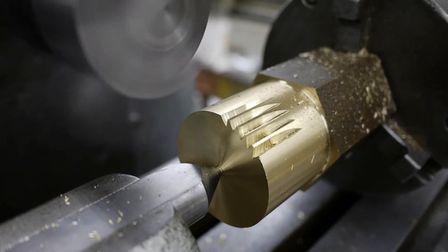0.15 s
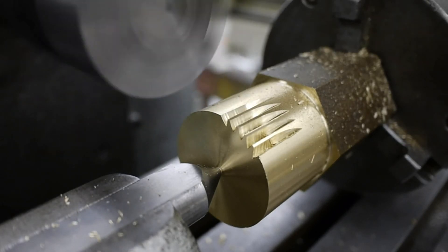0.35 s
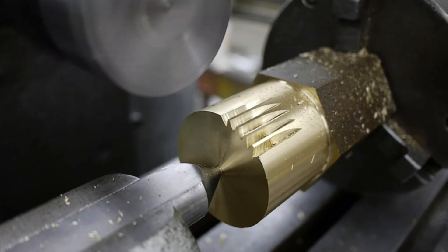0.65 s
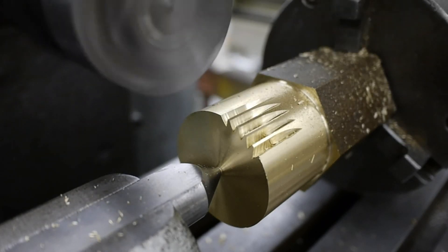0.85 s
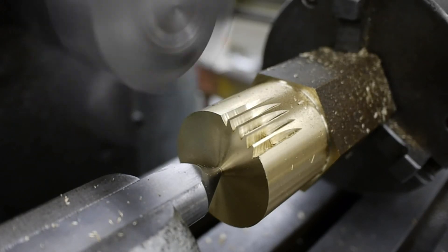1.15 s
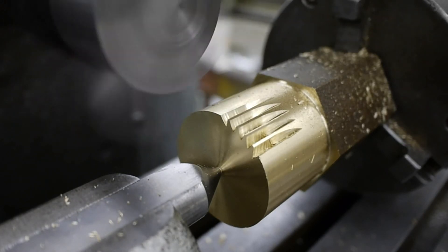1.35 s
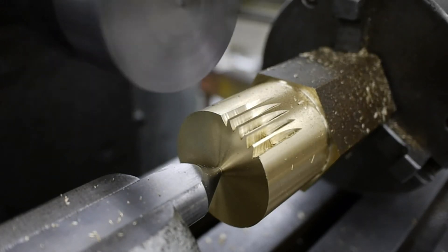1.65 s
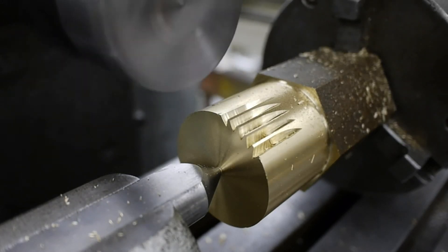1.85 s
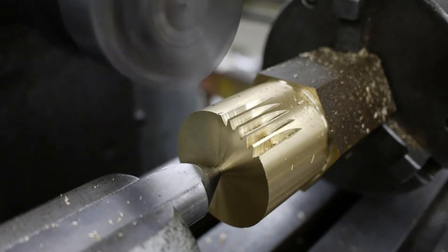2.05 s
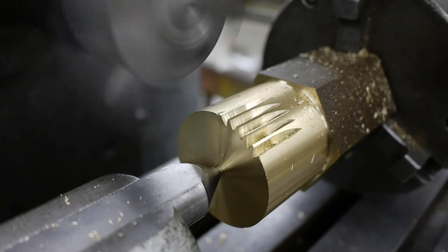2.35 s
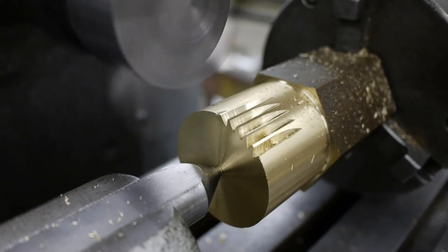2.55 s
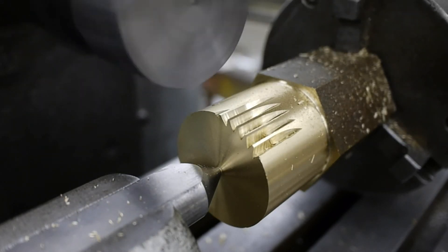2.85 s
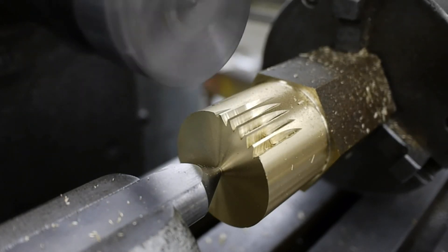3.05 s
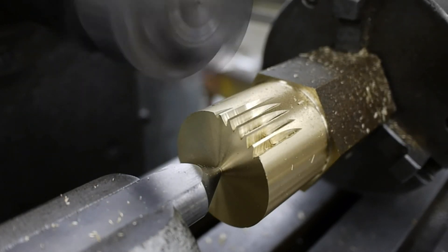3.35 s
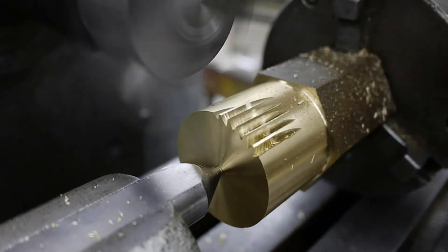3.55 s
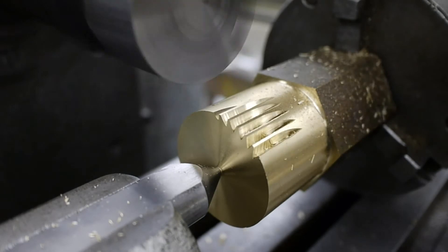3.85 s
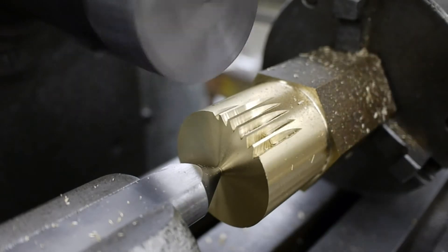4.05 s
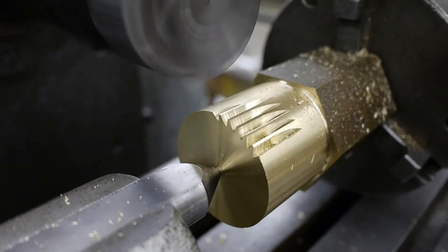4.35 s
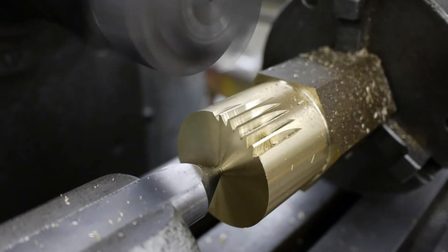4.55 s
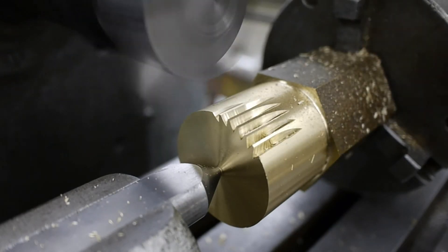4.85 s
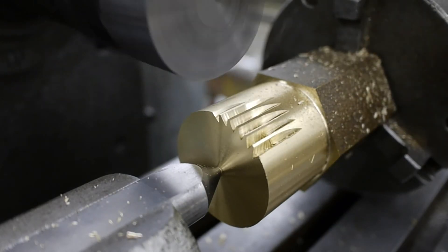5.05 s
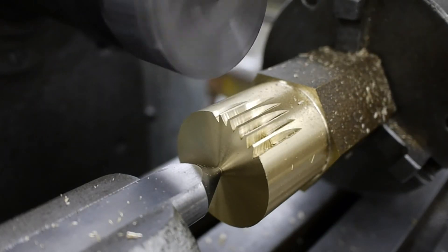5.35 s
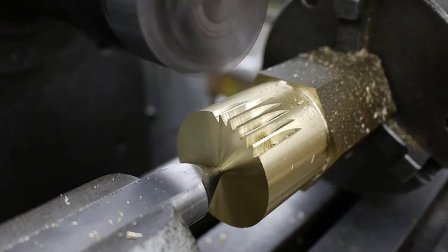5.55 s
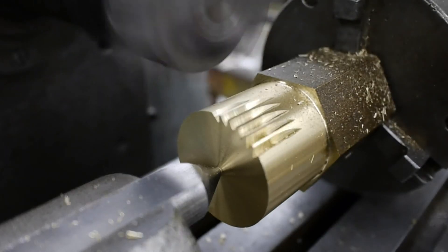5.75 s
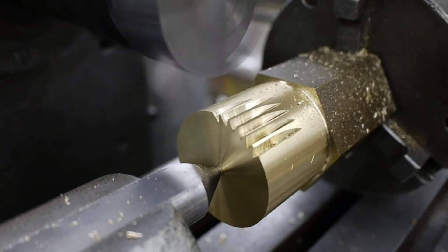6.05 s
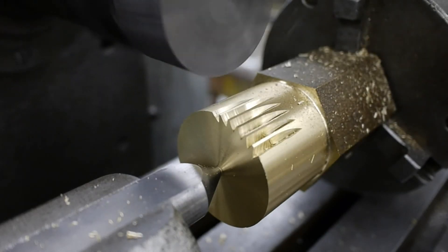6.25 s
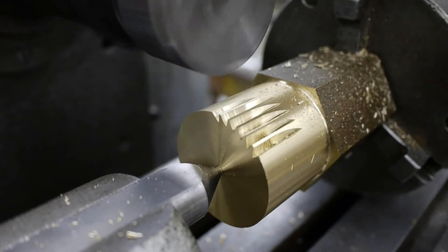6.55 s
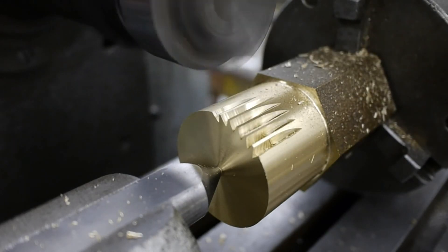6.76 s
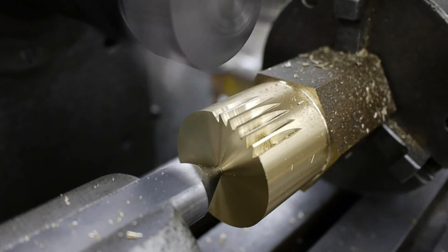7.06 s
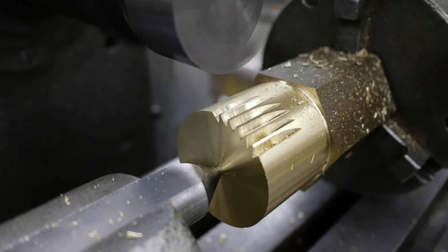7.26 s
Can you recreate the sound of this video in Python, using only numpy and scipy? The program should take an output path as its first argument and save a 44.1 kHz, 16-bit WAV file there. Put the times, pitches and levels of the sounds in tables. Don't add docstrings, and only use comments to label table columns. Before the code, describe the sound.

Continuous piercing machine whine and metallic hiss without bass, wavering slightly under load, then brief hand-wheel squeaks and dull knocks in the last seconds.

```python
import sys
import numpy as np
from scipy import signal
from scipy.fft import rfft, irfft
from scipy.io import wavfile
from scipy.ndimage import uniform_filter1d

SR = 44100
rng = np.random.default_rng(int(sys.argv[2]) if len(sys.argv) > 2 else 0)


def boost(x):
    u = np.asarray(x, float) / 20
    return 10 ** u


def pcm_store(signal):
    levels = np.round(np.clip(np.atleast_2d(signal), -1, 1) * 32767)
    wavfile.write(sys.argv[1], SR, levels.astype(np.int16).T)


N = 326781
T = np.arange(N) / SR
PULSE_HZ = 70.8


def evened(x):
    return x / np.sqrt(np.mean(x ** 2) + 1e-20)


def curves(rows, t):
    s, *columns = np.transpose(rows)
    return np.array([np.interp(t, s, c) for c in columns])


def add(mix, s, sound):
    part = mix[round(s * SR):][:len(sound)]
    part += sound[:len(part)]


def wander(low_hz, top_hz, count):
    t = T[::256]
    hz = np.geomspace(low_hz, top_hz, 24)[:, None]
    waves = np.sin(2 * np.pi * (hz * t + rng.random((count, 24, 1)))) / np.sqrt(hz)
    return [np.interp(T, t, evened(w)) for w in waves.sum(1)]


def bumps(rows, t):
    return sum(db * np.maximum(1 - abs(t - s) / half, 0) for s, db, half in rows)


# t/s, level/dB
MACHINE_LEVEL = [(0, -22.5), (.5, -22.5), (.9, -22), (1.4, -22), (1.9, -23.2), (2.25, -24.5), (2.33, -22),
                 (2.65, -23.5), (3.05, -23), (3.35, -24), (3.75, -23.5), (4.2, -25), (4.8, -27),
                 (5.12, -24.5), (5.5, -25), (6.0, -25), (6.45, -26), (7.41, -28)]


def fade(t):
    return curves(MACHINE_LEVEL, t)[0] + 23.1


# t/s, level change/dB, half length/s
LOAD_SAGS = [(.768, -2.5, 0.027), (.973, -2, 0.071), (1.14, -2.5, 0.086), (1.532, -2.5, 0.1),
             (1.81, -2.6, 0.089), (2.709, -0.2, .04), (2.868, -1.2, .06), (2.958, -3, 0.046),
             (3.183, -1.3, 0.04), (3.715, -2, 0.06), (3.896, -2.5, 0.061), (4.11, -1.1, 0.12),
             (4.515, -2, 0.03), (4.62, -1.8, 0.069), (4.709, -2.5, 0.065), (5.0, -1, 0.043),
             (5.225, -3.5, 0.11), (5.607, -0.5, .06), (5.77, 2.5, 0.043), (6.1, -1, .08), (6.271, -2, 0.11),
             (6.545, -3, 0.094), (6.68, -2.5, 0.062), (6.76, -5, 0.083), (6.914, -0.5, .05),
             (6.979, 0, .05), (7.139, -1.5, 0.061)]


def machine_level():
    return boost(curves(MACHINE_LEVEL, T)[0] + bumps(LOAD_SAGS, T))


# f/Hz, level/dB per Hz
BEARING_NOISE = [(30, -54.3), (150, -55.4), (400, -51.0), (700, -44.5), (1100, -33.3), (1800, -27.0),
                 (2300, -29.4), (3300, -26.4), (4300, -23.7), (5800, -18.0), (7500, -12.0), (10500, -14.4),
                 (13000, -12.7), (15600, -13.7)]
# f/Hz, width/Hz, level over the hiss/dB
CASTING_RINGS = [(821, 55, 7.0), (1504, 112, 5.8), (2163, 177, 8.7), (2485, 116, 16.0), (2698, 257, 14.0),
                 (3193, 694, 11.5), (3456, 50, 10.5), (3689, 169, 14.6), (3941, 699, 9.6),
                 (4581, 396, 11.2), (4948, 223, 9.8), (5218, 203, 15.4), (5496, 248, 14.8),
                 (5724, 276, 11.7), (6065, 254, 13.4), (6243, 182, 16.0), (6513, 551, 11.0),
                 (6992, 126, 8.3), (7171, 141, 4.1), (7596, 50, -5.0), (8170, 699, 0.7), (8542, 288, 4.7),
                 (9144, 699, 2.7), (9550, 106, 2.2), (9793, 699, 4.0), (10805, 699, 2.6), (12288, 313, 1.9),
                 (13224, 490, -1.8), (14128, 699, -2.3), (15455, 50, -0.5)]


def hiss(patchy_db=0.8, flicker_db=0.63, grit_db=0.5):
    frames = N // 256 + 5
    slow_fade = fade(np.arange(frames) * 256 / SR)
    hz = np.fft.rfftfreq(1024, 1 / SR)[:, None]
    real, imag, patches = rng.standard_normal((frames, 513, 3)).T

    gap_noise = evened(uniform_filter1d(uniform_filter1d(patches, 3, 0), 7, 1))
    gaps = gap_noise < .12 * slow_fade - 1
    gap_db = np.where(gaps, -16, .7) * (hz > 640) * (hz < 1150)

    patches = evened(uniform_filter1d(uniform_filter1d(patches, 14, 0), 12, 1))
    middle_db, low_db = np.outer([-0.1, -0.64], slow_fade)
    lean_db = np.where(hz < 2400, low_db, np.clip((8500 - hz) / 1000, 0, 1) * middle_db)
    spectrum = (real + 1j * imag) * boost(patchy_db * patches + lean_db + gap_db)
    x = signal.istft(spectrum, nperseg=1024, noverlap=768)[1][:N]

    x *= boost(grit_db * evened(uniform_filter1d(rng.standard_normal(N), 30)))
    x *= 1 + .045 * sum(np.cos(2 * np.pi * k * PULSE_HZ * T) for k in (1, 2))
    x *= boost(flicker_db * wander(8.8, 60, count=1)[0])

    hz = np.fft.rfftfreq(N, 1 / SR)
    peaks = sum(boost(2 * db) / (1 + (2 * (hz - f) / w) ** 2) ** 2 for f, w, db in CASTING_RINGS)
    f, db = np.transpose(BEARING_NOISE)
    db = db - np.interp(f, [170, 350, 700, 1100, 1800], [7, 0.5, 3.5, 2.5, 0])
    colour = boost(np.interp(np.log(hz + 1), np.log(f), db)) * np.sqrt(1 + peaks)
    return evened(irfft(rfft(x) * colour, N))


# f/Hz, level/dB
WHEEL_RING = [(1200, 1), (2200, -1), (3400, 2.5), (4000, 11), (4400, 0), (4800, 14), (5200, 15.5),
              (5600, 17), (6000, 7), (6600, -3)]


def slip(points):
    t = np.arange(points[0][0], points[-1][0], 1 / SR)
    hz, grip_db = curves(points, t)
    hz = uniform_filter1d(hz, 60, mode="nearest")
    turns = np.cumsum(hz) / SR
    stack = sum(boost(curves(WHEEL_RING, k * hz)[0]) * np.sin(2 * np.pi * k * turns) for k in (1, 2, 3, 4))
    return t[0], np.sqrt(2) * stack * boost(grip_db) * signal.windows.tukey(len(t), .1)


def squeak(length, hz, end_share, dbs):
    n = round(length * SR)
    pitch, grip = (evened(uniform_filter1d(rng.standard_normal(3000), 130))[:n] for _ in range(2))
    uneven = 1 + .2 / (hz * length) * pitch
    turns = np.cumsum(hz * np.linspace(1, end_share, n) * uneven) / SR
    stack = sum(boost(db) * np.sin(2 * np.pi * (k + 1) * turns) for k, db in enumerate(dbs))
    return 1.4 * stack * boost(1.3 * grip) * signal.windows.tukey(n, .3)


# t/s, length/s, f/Hz, level of the strongest partial/dB
DULL_SQUEAKS = [
    (5.972, 0.012, 1935, -33),
    (5.984, 0.0115, 1710, -38),
]
NASAL_SQUEAKS = [(5.027, 0.013, 2330, -29), (5.044, .011, 2460, -32), (5.121, .008, 2314, -28),
                 (5.129, .008, 2300, -31), (5.146, 0.015, 2330, -31), (5.821, .008, 2090, -26.5),
                 (5.781, .011, 2355, -28), (5.891, .008, 1150, -32), (5.901, .008, 1150, -44),
                 (5.984, 0.016, 1920, -30), (6.576, .011, 2220, -32), (6.586, 0.0064, 2180, -30),
                 (6.929, 0.0091, 2030, -32)]
SHRILL_SQUEAKS = [
    (5.738, 0.022, 2400, -31),
    (5.782, 0.0081, 2380, -30),
    (5.789, .006, 2220, -24),
    (5.794, .007, 2380, -25),
    (5.826, 0.0064, 2185, -30),
    (5.831, .013, 2365, -22.5),
    (5.845, .006, 2320, -29),
]
HOLLOW_SQUEAKS = [
    (6.946, 0.011, 2560, -24.5),
    (7.024, .007, 2320, -39),
]
BRIGHT_SQUEAKS = [
    (7.243, 0.017, 2135, -24.5),
    (7.257, .021, 2156, -22),
    (7.277, .014, 2115, -31),
]
PLAIN_SQUEAKS = [(4.945, .01, 2700, -36), (5.004, 0.01, 2410, -41), (5.087, .021, 2455, -33.5),
                 (5.756, 0.024, 2560, -30.5), (5.783, .017, 2470, -40), (6.978, .013, 1640, -41),
                 (7.077, 0.011, 2450, -37), (7.022, 0.012, 1300, -46)]
# 1st level/dB, 2nd level/dB, ..
GRIP_PARTIALS = [(-1.5, 0.33, -15), (-14.5, -2.5, -10), (-22, -14, -0.5, -13, -9), (-8, -8, -1),
                 (-20, -6.5, -1.5), (-1.5, -25, -25)]
# t/s, f/Hz, level/dB
GLIDING_SLIPS = [
    [(6.614, 2490, -50), (6.618, 2395, -45), (6.624, 2170, -41), (6.64, 2200, -41), (6.646, 1975, -45),
     (6.652, 1600, -50)],
    [(6.704, 1810, -52), (6.707, 1860, -43), (6.711, 1865, -42), (6.715, 1770, -41), (6.721, 1830, -50),
     (6.729, 1990, -43.5), (6.739, 1990, -45), (6.745, 1865, -45), (6.749, 1850, -58)],
    [(6.76, 1660, -50), (6.764, 1720, -42), (6.768, 1750, -39.5), (6.773, 1690, -40.5), (6.778, 1440, -47),
     (6.787, 1190, -49)],
    [(6.996, 1850, -44), (6.9975, 1780, -33), (7.0005, 1680, -40), (7.003, 1620, -38), (7.008, 1530, -38),
     (7.011, 1540, -48), (7.016, 1620, -46)],
]


def squeaks():
    out = np.zeros(N)
    tables = (DULL_SQUEAKS, NASAL_SQUEAKS, SHRILL_SQUEAKS, HOLLOW_SQUEAKS, BRIGHT_SQUEAKS, PLAIN_SQUEAKS)
    for rows, grip_db in zip(tables, GRIP_PARTIALS):
        for s, length, hz, db in rows:
            add(out, s, squeak(length, hz, 0.99, db + np.array(grip_db)))
    for points in GLIDING_SLIPS:
        add(out, *slip(points))
    return signal.sosfilt(signal.butter(8, 900, "high", fs=SR, output="sos"), out)


# t/s, f/Hz, width/Hz, peak level/dB, time to die away by 60 dB/s
KNOCK_RATTLES = [(1.076, 8500, 1600, -22, .2), (1.076, 12500, 6200, -22, .2), (1.076, 4300, 1500, -29, .08),
                 (1.09, 15000, 1200, -30, .15), (1.488, 8000, 9000, -22, .004),
                 (3.958, 3700, 700, -33, .08), (4.258, 3000, 2500, -33, .01), (1.981, 600, 150, -69, .1),
                 (2.081, 620, 150, -68, .1), (6.151, 800, 500, -59, .12), (6.151, 1700, 800, -46, .1),
                 (6.296, 950, 300, -58, .15), (6.303, 650, 250, -66, .3), (6.351, 750, 300, -60, .25),
                 (6.351, 1600, 600, -48, .1), (6.455, 340, 120, -76, .2), (6.46, 650, 300, -66, .4),
                 (6.434, 1650, 900, -40, .08), (6.434, 3000, 1900, -35, .08), (6.506, 1700, 600, -48, .08)]
# t/s, f/Hz, peak level/dB, time to die away by 60 dB/s
KNOCK_RINGS = [(6.151, 1020, -52, .15), (6.151, 560, -62, .15), (6.303, 560, -62, .3),
               (6.35, 640, -48, .13), (6.35, 340, -66, .25), (6.35, 980, -52, .12), (6.35, 1620, -42, .1),
               (6.368, 860, -52, .12), (6.434, 320, -56, .09), (6.434, 790, -53, .15),
               (6.434, 1150, -44, .1), (6.434, 1540, -34, .08), (6.434, 2250, -44, .1),
               (6.506, 820, -55, .15), (6.506, 250, -70, .1)]


def knocks():
    out, t = np.zeros(N), T[:SR // 4]
    for s, hz, width, db, t60 in KNOCK_RATTLES:
        band = signal.butter(3, [hz - width / 2, hz + width / 2], "band", fs=SR, output="sos")
        rattle = rng.standard_normal(len(t)) * boost(-60 * t / t60)
        rattle[0] = 1.2 * np.sqrt(SR / width)
        add(out, s, boost(db) * np.sqrt(SR / 2 / width) * signal.sosfilt(band, rattle))
    for s, hz, db, t60 in KNOCK_RINGS:
        ring = boost(db - 60 * t / t60) * np.sin(2 * np.pi * hz * t)
        add(out, s, ring * np.minimum(t / .002, 1))
    return out


def hand_wheel():
    out, t = squeaks() + knocks(), T[:SR // 4]
    tail = rng.standard_normal(len(t)) * boost(-60 * t / .12) * (t > .003)
    return out + boost(-15) * signal.oaconvolve(out, tail / np.linalg.norm(tail))[:N]


# multiple of the pulse rate, level/dB
FEED_PANELS = [
    [(10, -14), (11, -4), (12, 0), (13, -4), (14, -11), (15, -4), (16, -12)],
    [(17, 0), (18, -5), (19, -3), (20, -4)],
    [(21, -8), (22, -5), (23, -7), (24, 0), (25, -4), (27, -14)],
]
PANEL_REST = (-77, -61.5, -73)
# start t/s, end t/s, level change/dB
PANEL_SPELLS = [
    [(2.0, 7.6, 4.5), (2.5, 7.6, 1.5), (3.5, 7.6, 5.5), (6.0, 6.4, 3.5)],
    [(.5, .9, -3), (1.5, 4.5, 3), (2.9, 3.7, 4), (5.5, 5.6, 3), (5.8, 5.9, -4), (6.4, 6.7, -1.5),
     (6.95, 7.6, 4.5)],
    [(.25, .3, 3), (2.1, 3.85, 21), (3.0, 3.6, 2.5), (5.4, 6.75, 20.5), (7.2, 7.6, 5)],
]


def feed(waver_db=2.0):
    first_pulse_s, ramp_s = .0098, 0.31
    out = np.zeros(N)
    for panel, rest_db, spells in zip(FEED_PANELS, PANEL_REST, PANEL_SPELLS):
        panel_db = rest_db + sum(db * np.clip(1 + np.minimum(T - a, b - T) / ramp_s, 0, 1)
                                 for a, b, db in spells)
        waver = wander(0.472, 10, count=len(panel))
        pulses = np.zeros(N)
        for (k, db), w in zip(panel, waver):
            smear = .8 * min(k - 17, 0) ** 2
            phase = 2 * np.pi * k * PULSE_HZ * (T - first_pulse_s) + .3 * w + smear
            pulses += boost(db + waver_db * w) * np.cos(phase)
        out += boost(panel_db) * evened(pulses)
    return out


def lines(hz, db, turns, waver_db):
    drift, waver = wander(0.294, 6, count=len(hz)), wander(0.504, 12, count=len(hz))
    return [np.sqrt(2) * boost(d + waver_db * w) * np.sin(2 * np.pi * (f * T + turns * u))
            for f, d, u, w in zip(hz, db, drift, waver)]


# multiple of the tooth rate, level against the machine/dB
GEAR_WHINE = [(1, -50.5), (2, -38.0), (3, -36.0), (4, -29.0), (5, -22.0), (6, -18.0), (7, -36.0),
              (8, -24.0), (9, -20.0), (10, -29.0), (11, -14.0), (12, -19.0), (13, -26.0), (14, -28.0),
              (15, -18.0), (16, -12.0), (17, -28.0), (18, -29.0), (19, -23.0), (20, -24.0), (21, -26.0),
              (22, -29.0), (23, -39.0), (24, -36.0)]
# f/Hz, level against the machine/dB
SIDE_TONES = [(580, -60), (1518, -41), (2196, -41), (2724, -25), (3257, -33), (3461, -31), (3600, -22),
              (5167, -21), (5240, -28), (5275, -23), (5310, -28), (5452, -25), (5644, -24), (5709, -28),
              (6307, -21), (6584, -26), (6952, -28), (9582, -30)]
STANDING_WAVES = {1: [(3.2, -3, 0.65), (5.1, -1.5, 0.79), (6.1, -3, 0.39)], 3: [(.4, 2, .5),
                  (4.7, -8, 0.37), (7.1, 5, 1)], 6: [(.2, 3.5, 0.26), (.62, -6.5, 0.81), (2.0, -6.5, .4),
                  (2.45, -5, 0.21), (3.45, -10, 0.67), (4.7, -7, 0.55), (5.85, -2, 0.27), (6.65, -6, 1),
                  (7.3, -3, .35)], 11: [(0, -30, 0.083), (3.0, -1, .3), (4.6, -4, .5), (6.0, -17, 0.46),
                  (6.7, -19, 0.4), (7.3, -6, .4)], 15: [(0, -16, 0.3), (1.5, -6, .9), (2.5, -8, 0.28),
                  (3.07, 4, .35), (6.13, 1, .3), (6.65, -15, 0.36)], 16: [(.3, 4.5, .35), (1.95, -5, .3),
                  (3.55, -14, 0.58), (4.95, -9, 0.38), (5.65, -11, 0.38), (6.4, -2.5, 0.69), (7.3, -2, .3)]}
STANDING_REST = (1, 0.74, 3.2, 1.5, 1.6, 0.45)


def gears():
    mesh_hz = 612.2
    k, db = np.transpose(GEAR_WHINE)
    tones = lines(k * mesh_hz, db - .7, turns=.16, waver_db=1.7)
    for (order, changes), rest_db in zip(STANDING_WAVES.items(), STANDING_REST):
        tones[order - 1] = tones[order - 1] * boost(rest_db + bumps(changes, T))
    beat_s, first_dip_s = 1.33, 0.96
    beat = abs(1 - 0.74 * np.exp(2j * np.pi * (T - first_dip_s) / beat_s))
    tones[0] = tones[0] * boost(2.0 * wander(3, 25, count=1)[0]) * beat
    low = sum(tones[:3]) * boost(-.8 * fade(T))
    side = sum(lines(*np.transpose(SIDE_TONES), turns=.2, waver_db=2.5))
    return low + sum(tones[3:]) + side


def scene():
    machine = machine_level() * (boost(0.21) * hiss() + gears())
    thin = signal.butter(4, 220, "high", fs=SR, output="sos")
    return np.tile(machine + signal.sosfilt(thin, feed() + hand_wheel()), (2, 1))


def roll_off(x):
    return signal.sosfilt(signal.butter(12, 16870, fs=SR, output="sos"), x)


def record(dry):
    edge = signal.firwin(1023, 15740, window=("kaiser", 9), fs=SR)
    return roll_off(signal.oaconvolve(dry, edge[None], "same"))


dry = scene()
out = record(dry)
pcm_store(out)
```